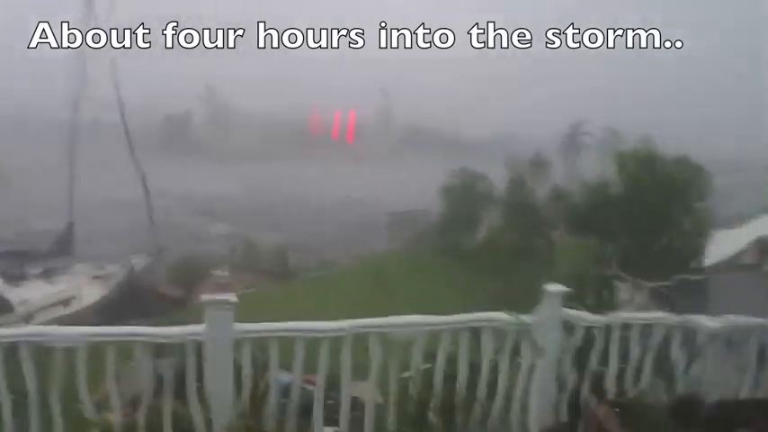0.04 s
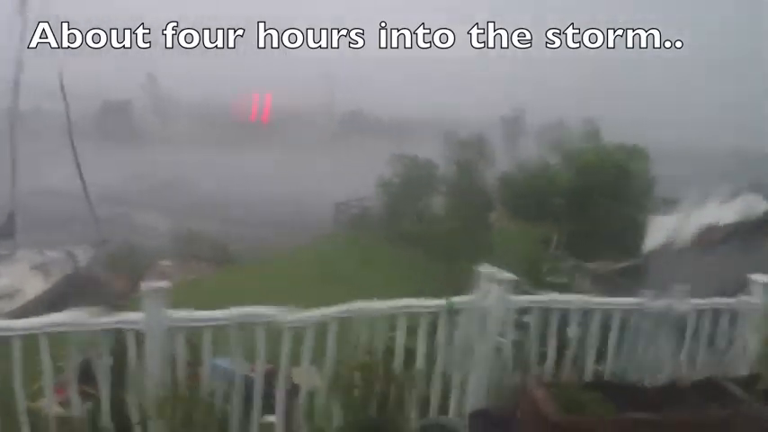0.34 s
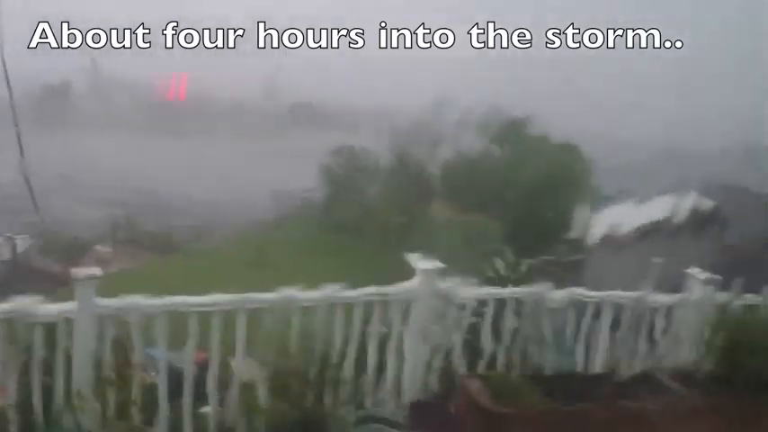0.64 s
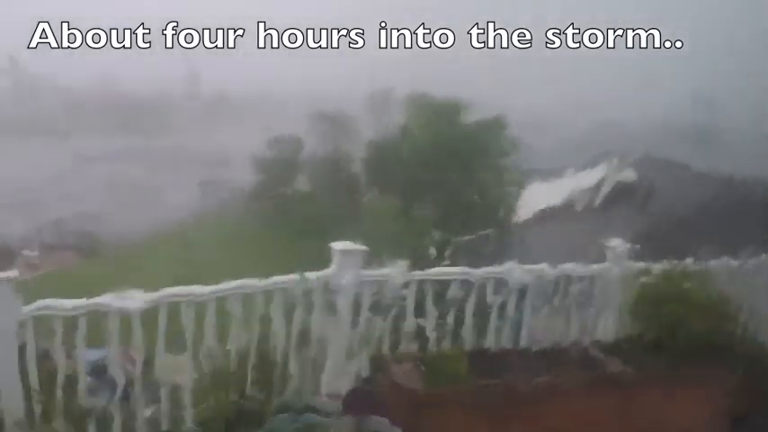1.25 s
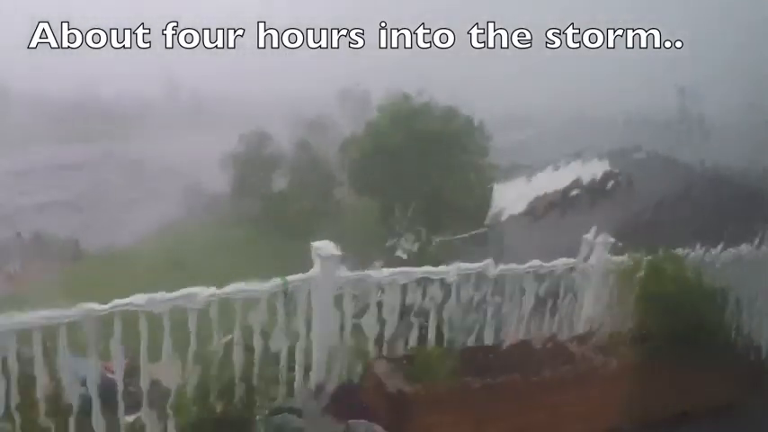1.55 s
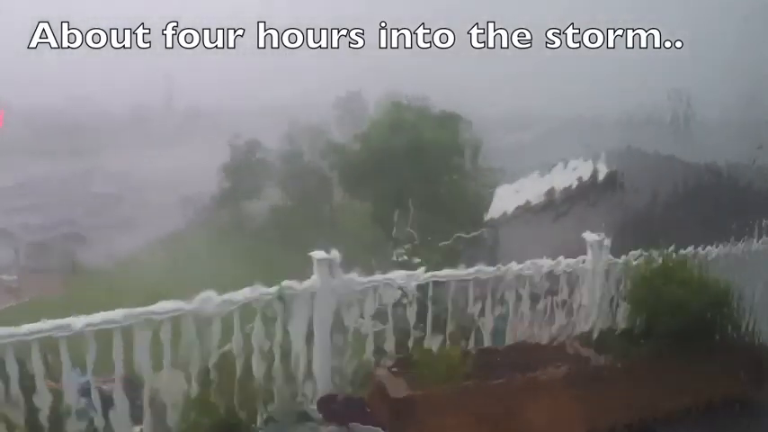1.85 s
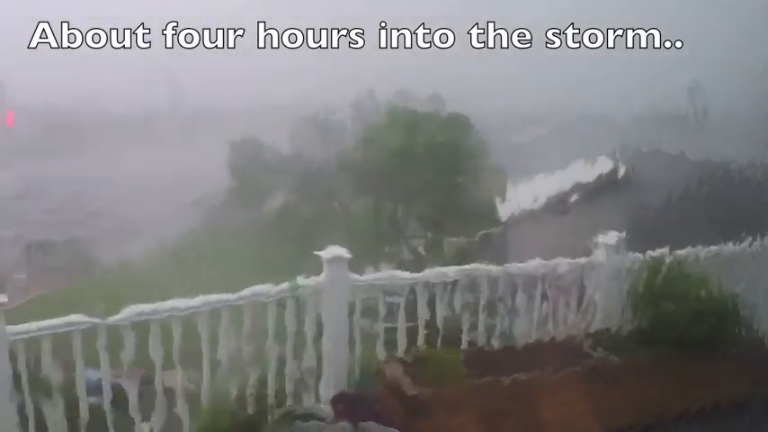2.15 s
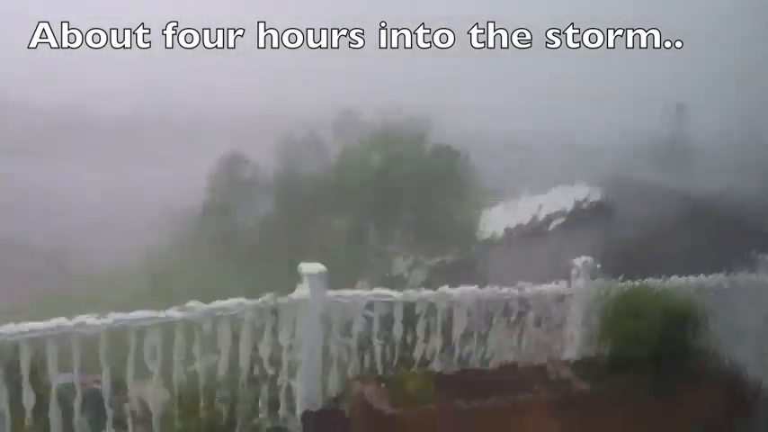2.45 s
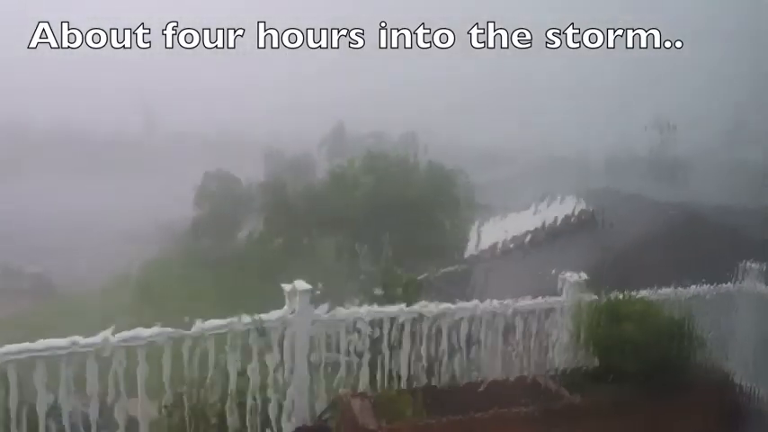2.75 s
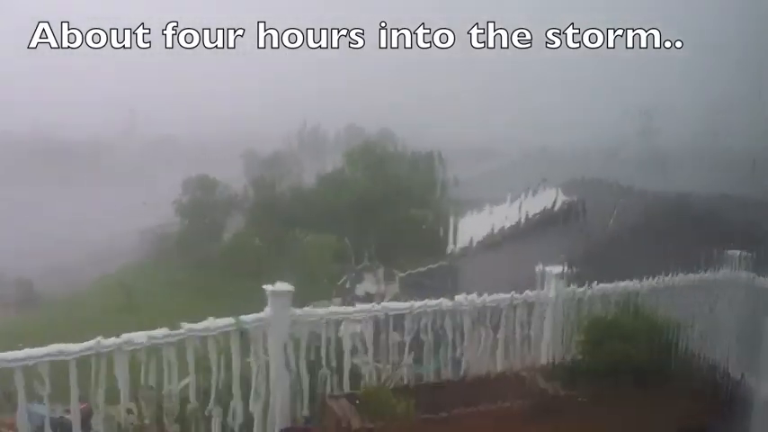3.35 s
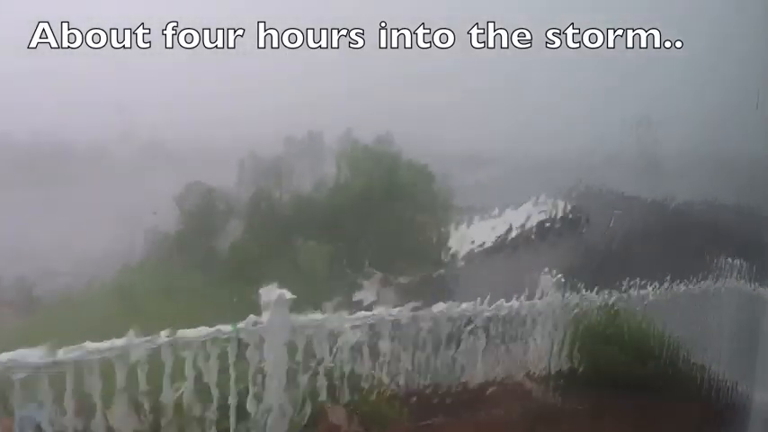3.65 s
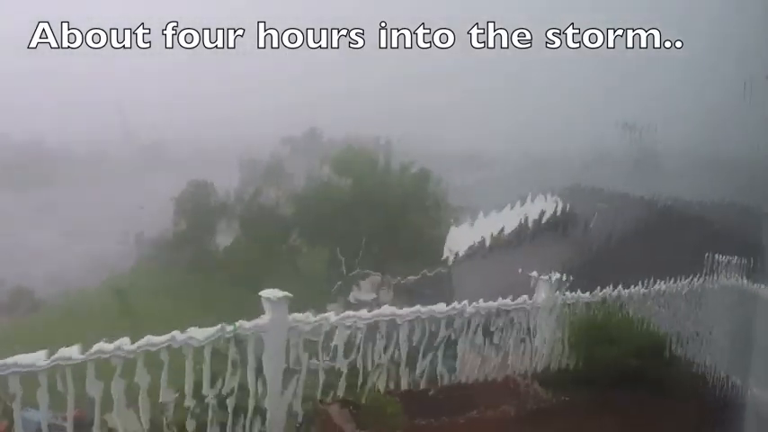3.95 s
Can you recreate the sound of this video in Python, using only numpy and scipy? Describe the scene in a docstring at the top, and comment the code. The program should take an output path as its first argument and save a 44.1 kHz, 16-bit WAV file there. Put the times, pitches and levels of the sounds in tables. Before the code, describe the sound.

Storm wind rumbles deeply and roars dully throughout, heard from behind a closed window. A hollow rush fades in the first second as a hoarse howl swells. From about 1 to 2.5 seconds, sheets of rain hit the pane with hiss and ticking drops, while a long gust booms through the walls. Something small knocks near 3 seconds. Around 3.4, a short gust brings more rain and the howl returns.

```python
"""A storm heard from behind a closed window. Throughout, wind pressure shakes the building with a deep
rumble and the wind roars dully outside. At first a hollow rush dies away and a hoarse howl swells.
After a second, sheets of rain are flung against the pane, with hissing spray and heavy drops that tick,
and a long gust makes walls and pane boom. Near three seconds something small knocks on the window;
then a last short gust arrives with more rain, and the howl returns."""
import sys
import numpy as np
from scipy import signal
from scipy.fft import rfft, irfft
from scipy.io import wavfile

SR = 44100
rng = np.random.default_rng(int(sys.argv[2]) if len(sys.argv) > 2 else 0)


def materialize(psi):
    """Save the field psi as 16-bit PCM at rate SR to the path in sys.argv[1].

    A 1-D psi becomes a single channel; in a 2-D psi each row is a channel.
    """
    bounded = np.clip(np.atleast_2d(psi).T, -1, 1)
    quanta = np.round(bounded * 32767).astype(np.int16)
    wavfile.write(sys.argv[1], SR, quanta)


N = 176400


# Wind pressure on the building: time_s, level_db
WIND_PRESSURE = [(0, -35), (.1, -25.5), (.2, -29.5), (.32, -27), (.42, -30.5), (.65, -27.5), (.75, -31.5),
                 (.84, -29.5), (1.1, -31.5), (1.5, -27.5), (1.78, -25.5), (2.15, -23.5), (2.43, -26),
                 (2.66, -23), (2.85, -24), (3.35, -29.5), (3.52, -21.5), (3.64, -29.5), (3.82, -28.5),
                 (4, -25)]
# Spectrum of the rumble: frequency_hz, relative_density_db
RUMBLE_SPECTRUM = [(20, -1.5), (30, -1.5), (40, 1.5), (60, 0.5), (80, -4.5), (110, -7), (150, -11.5),
                   (180, -19), (215, -19), (280, -29.5), (330, -28)]
def buffeting():
    """Forced vibration: fluctuating wind pressure shakes the building with a deep rumble."""
    level_db = np.interp(seconds(), *np.transpose(WIND_PRESSURE)) - 1
    return from_db(level_db) * turbulence(RUMBLE_SPECTRUM, flutter_db=0.45, flutter_hz=8.2)


# Gusts that lean on the wall: start_s, gain_db, attack_s, hold_s, fade_db_per_s
GUST_SURGES = [(1.35, -0.5, 0.46, 0.85, 27), (3.38, -8, .12, 0.027, 43)]
# Modes of walls and pane: pitch_hz, width_hz, level_db
WALL_MODES = [(114, 28.6, -35), (216.2, 53, -43), (322, 194, -46.5)]
def wall_boom():
    """Resonance: strong gusts excite the low modes of walls and pane."""
    return surges(GUST_SURGES) * resonances(WALL_MODES)


# Sheets of rain reaching the pane: start_s, level_db, attack_s, hold_s, fade_db_per_s
RAIN_SHEETS = [(-.05, -44.5, .03, 0.031, 45), (.2, -54, 0.047, 0.075, 8.5), (1.06, -36, 0.02, 0.024, 36),
               (1.24, -33, 0.019, 0.017, 72.5), (1.403, -37, .015, 0.17, 45.5),
               (1.445, -33.5, 0.016, 0.021, 89), (1.56, -39.5, 0.062, 0.32, 26),
               (1.952, -37.5, 0.01, 0.013, 97), (2.04, -42.5, 0.085, 0.2, 52.5),
               (3.362, -43, 0.014, 0.0095, 266), (3.4, -45.5, 0.05, 0.12, 73)]
# The pane's response to a drop: frequency_hz, relative_density_db
PANE_RESPONSE = [(150, -15), (300, 3), (500, 2), (700, 3.5), (1100, 1.5), (1600, 3), (2200, 3.5),
                 (3000, -1.5), (4200, -7.5), (5400, -12.5), (7000, -21.5), (9000, -28.5), (11000, -31.5),
                 (15500, -51.5)]
def rain_on_pane():
    """Shot noise: random drops drive the pane, denser and louder as the rain grows heavier."""
    load = surges(RAIN_SHEETS)
    drops_per_s = 9000 * np.sqrt(load / load.max())
    drumming = colour(patter(drops_per_s, spread_db=0), PANE_RESPONSE)
    return load * rms_one(room(drumming))


# Fine spray reaching the glass: start_s, level_db, attack_s, hold_s, fade_db_per_s
SPRAY_SURGES = [(-.05, -69.5, .03, .1, 26), (.12, -65.5, 0.11, 0.17, 47), (1.062, -54.5, .01, 0.014, 90),
                (1.243, -57, .01, .02, 60), (1.405, -54.5, .01, 0.091, 40), (1.75, -61.5, 0.068, .25, 23),
                (2.2, -61, 0.04, 0.13, 70), (3.368, -54, 0.014, 0.01, 506.5),
                (3.4, -65.5, 0.028, 0.055, 61)]
# Spectrum of the spray: frequency_hz, relative_density_db
SPRAY_SPECTRUM = [(2000, -13), (3500, 5.5), (5400, 4), (7500, -0.5), (11000, -3), (15500, -7)]
def spray():
    """Superposition: the tiny impacts of many droplets merge into a hiss."""
    hiss = colour(patter(per_s=2500, spread_db=3), SPRAY_SPECTRUM)
    return surges(SPRAY_SURGES) * rms_one(hiss)


# Heavy drops hitting the glass: start_s, strength_db
HEAVY_DROPS = [(1.035, -46), (1.3775, -29.5), (1.4085, -25.5), (1.4265, -28), (1.431, -26), (1.4395, -28),
               (1.4885, -29), (1.596, -28), (1.776, -36), (1.886, -31.5), (1.9975, -26.5), (2.039, -33),
               (2.064, -30.5), (2.36, -29), (2.533, -42)]
# Filter that shapes a bursting drop: frequency_hz, gain_db
SPLAT_RESPONSE = [(700, -23), (2000, -3), (3500, 7.5), (5500, 2.5), (7000, -13.5), (11000, -17),
                  (15500, -32)]
def heavy_drops():
    """Broadband transients: each heavy drop bursts too briefly to have a pitch, and ticks."""
    strays_per_s, stray_gain_db, decay_s = 19, 0.5, 0.0014
    # Further drops fall at random, as strong as the rain is at that moment.
    strays = (rng.random(N) < strays_per_s / SR) * surges(RAIN_SHEETS) * from_db(stray_gain_db)
    impacts = clicks_at(HEAVY_DROPS) + strays
    envelope = signal.lfilter([1], [1, -np.exp(-1 / (decay_s * SR))], impacts + 1e-18)
    return colour(envelope * rng.standard_normal(N), SPLAT_RESPONSE)


# Modes rung by the knock: pitch_hz, gain_db, t60_s
WINDOW_MODES = [(860, -4, 0.02), (1300, 3, .005), (1610, 2.5, 0.012), (2480, -11.5, .012),
                (3250, -13.5, 0.011), (5400, -13, .005)]
def knock(start_s=3.0657, strength_db=-31):
    """Free vibration: something small strikes the window once, and its damped modes ring out."""
    impact = clicks_at([(start_s, strength_db)])
    sound = 0
    for k, (hz, gain_db, t60_s) in enumerate(WINDOW_MODES):
        radius, angle = from_db(-60 / (t60_s * SR)), 2 * np.pi * hz / SR
        feedback = [1, -2 * radius * np.cos(angle), radius ** 2]
        ring = signal.lfilter([0, np.sin(angle)], feedback, impact * from_db(gain_db) + 1e-18)
        sound = sound + (-1) ** k * ring   # neighbouring modes start in opposite phase
    return sound


# The wind as heard through the glass: frequency_hz, relative_density_db
ROAR_SPECTRUM = [(150, 10), (260, 6), (370, 6.5), (520, 2), (640, 0.5), (760, -1), (1050, -1), (1650, -7.5),
                 (2150, -16.5), (3400, -19.5), (6500, -35), (13000, -40), (16000, -55)]
def wind_roar(level_db=-47):
    """Transmission loss: the glass muffles the treble of the turbulent wind outside."""
    return from_db(level_db) * turbulence(ROAR_SPECTRUM, flutter_db=1.37, flutter_hz=7.3)


# The opening rush of air: start_s, level_db, attack_s, hold_s, fade_db_per_s
RUSH_SURGES = [(-0.08, -49.5, 0.097, 0.29, 17)]
# Resonances of the rush: pitch_hz, width_hz, gain_db
HOLLOW_MODES = [(420, 250, -2), (684, 130, -6.5), (1560, 240, -3), (1780, 500, -4.5)]
def hollow_rush():
    """Broad resonances colour flow noise into a hollow rush, as of wind through a gap."""
    return surges(RUSH_SURGES) * resonances(HOLLOW_MODES)


# Swells of the howl: start_s, level_db, attack_s, hold_s, fade_db_per_s
HOWL_SURGES = [(.3, -60.5, 0.5, 0.38, 36), (3.4, -54, 0.22, 0.28, 20)]
# Resonances of the howl: pitch_hz, width_hz, gain_db
HOWL_RESONANCES = [(622, 51, -2.5), (1020, 48, -5), (1567, 250, -11)]
def howl():
    """Narrow-band noise: wind around the building howls with a hoarse pitch."""
    return surges(HOWL_SURGES) * resonances(HOWL_RESONANCES)


def room(sound, t60_s=0.3, tail_db=-11.5):
    """Reverberation: a furnished room adds a short diffuse tail, 3 ms after the direct sound."""
    t = seconds()
    tail = rng.standard_normal(N) * from_db(-60 * t / t60_s) * (t > .003)
    return sound + from_db(tail_db) * signal.fftconvolve(sound, tail / np.linalg.norm(tail))[:N]


def turbulence(spectrum, flutter_db, flutter_hz):
    """Amplitude modulation: half-octave bands of noise flutter, partly together; rms 1."""
    hz = np.maximum(np.arange(N // 2 + 1) * SR / N, 1)
    low_hz, high_hz = spectrum[0][0], spectrum[-1][0]
    roll_off = np.minimum(hz / low_hz, 1) ** 2 * np.minimum(high_hz / hz, 1) ** 4
    noise = rfft(rng.standard_normal(N)) * gain_at(spectrum, hz) * roll_off
    band = np.floor(2 * np.log2(np.clip(hz, 20, high_hz)))
    together = .5 * drift(flutter_hz / 2)
    sound = 0
    for k in np.unique(band):
        flutter = from_db(flutter_db * (together + drift(flutter_hz)))
        sound = sound + flutter * irfft(noise * (band == k), N)
    return rms_one(sound)


def resonances(modes):
    """Random excitation: for each mode, noise passes twice through a resonator."""
    sound = 0
    for hz, width_hz, db in modes:
        radius = np.exp(-np.pi * width_hz / SR)
        b, a = [1, 0.0084, -1], [1, -2 * radius * np.cos(2 * np.pi * hz / SR), radius ** 2]
        once = signal.lfilter(b, a, rng.standard_normal(N))
        sound = sound + from_db(db) * rms_one(signal.lfilter(b, a, once))
    return sound


def patter(per_s, spread_db):
    """Poisson process: random impacts, with unit power at any rate."""
    chance = np.clip(per_s / SR, 1e-5, 1)
    sizes = from_db(spread_db * np.minimum(rng.exponential(1, N), 4))
    signs = rng.choice([-1, 1], N)
    return rms_one(sizes * signs * (rng.random(N) < chance) / np.sqrt(chance))


def surges(rows):
    """Incoherent addition: attack-hold-fade envelopes sum in power; returns an amplitude."""
    t, power = seconds(), 1e-14
    for start_s, level_db, attack_s, hold_s, fade_db_per_s in rows:
        rise = np.clip((t - start_s) / attack_s, 0, 1)
        fading_s = np.maximum(t - start_s - attack_s - hold_s, 0)
        power = power + (rise * from_db(level_db - fade_db_per_s * fading_s)) ** 2
    return np.sqrt(power)


def clicks_at(rows):
    """Ideal impulses, one for each row."""
    clicks = np.zeros(N)
    for start_s, strength_db in rows:
        clicks[int(start_s * SR)] += from_db(strength_db)
    return clicks


def colour(sound, spectrum):
    """Minimum-phase filtering: the response never precedes the impact."""
    hz = np.maximum(np.arange(N + 1) * SR / (2 * N), 1)
    cepstrum = irfft(np.log(gain_at(spectrum, hz)))
    cepstrum[1:N] *= 2
    cepstrum[N + 1:] = 0
    return irfft(rfft(sound, 2 * N) * np.exp(rfft(cepstrum)))[:N]


def drift(rate_hz):
    """Low-passed noise: a slow random wander of rms 1."""
    step, settle = 40, 2000   # samples per slow step; steps for the filter to settle
    pole = np.exp(-2 * np.pi * rate_hz * step / SR)
    noise = rng.standard_normal(N // step + settle + 2)
    slow = signal.lfilter([1], [1, -2 * pole, pole ** 2], noise)[settle:]
    return np.interp(np.arange(N) / step, np.arange(len(slow)), rms_one(slow))


def gain_at(spectrum, hz):
    """Amplitude of a spectrum, interpolated in decibels over log frequency."""
    points_hz, points_db = np.transpose(spectrum)
    return from_db(np.interp(np.log(hz), np.log(points_hz), points_db))


def from_db(db):
    """Decibels to amplitude ratio."""
    return 10 ** (np.asarray(db) / 20)


def rms_one(x):
    """Normalisation to unit rms."""
    return x / np.sqrt(np.mean(x ** 2) + 1e-20)


def seconds():
    """The time of every sample."""
    return np.arange(N) / SR


def scene():
    """Superposition: building, window and wind add at one point indoors."""
    building = buffeting() + wall_boom()
    window = rain_on_pane() + spray() + room(heavy_drops() + knock())
    wind = wind_roar() + hollow_rush() + howl()
    return (building + window + wind)[None]


def record(dry):
    """Band limiting: a steep low-pass filter removes the highest treble."""
    cutoff_hz = 15400
    return signal.sosfilt(signal.ellip(12, .1, 90, cutoff_hz, fs=SR, output="sos"), dry)


dry = scene()
out = record(dry)
materialize(out)
```